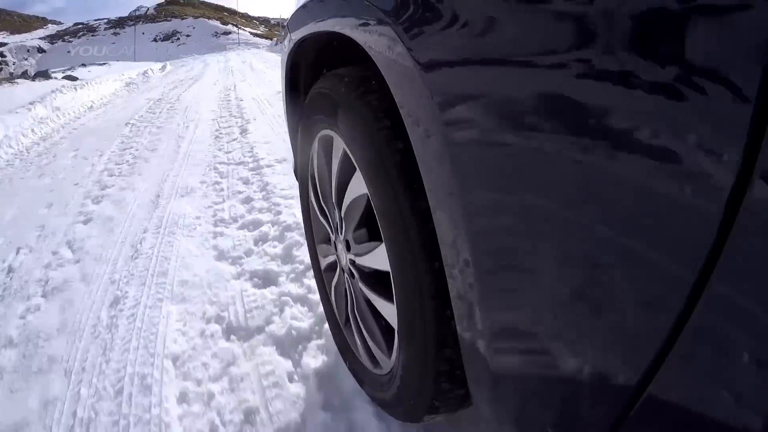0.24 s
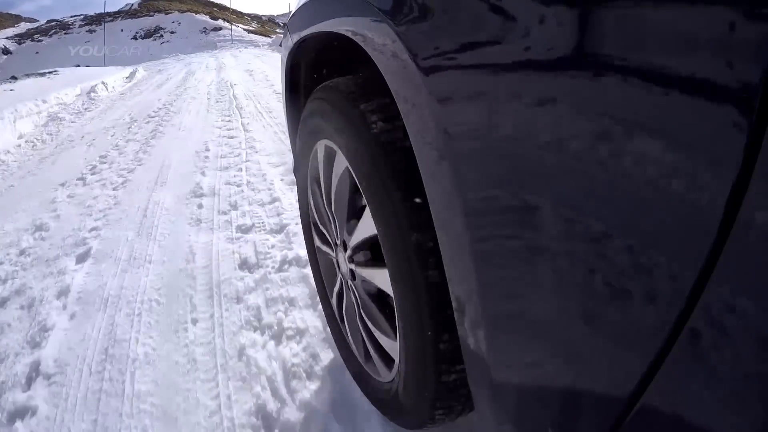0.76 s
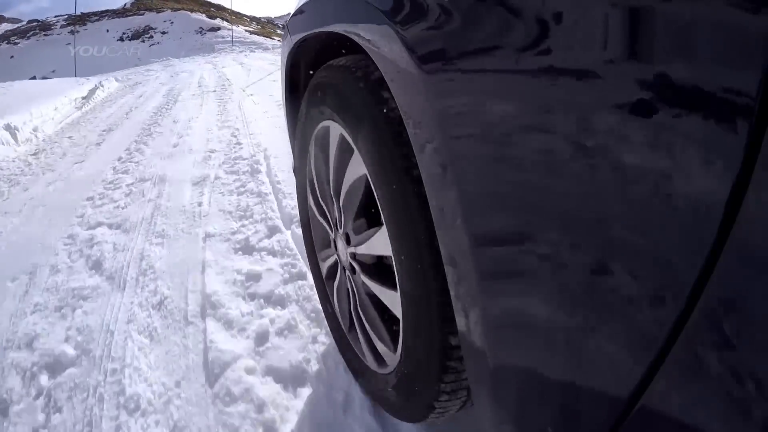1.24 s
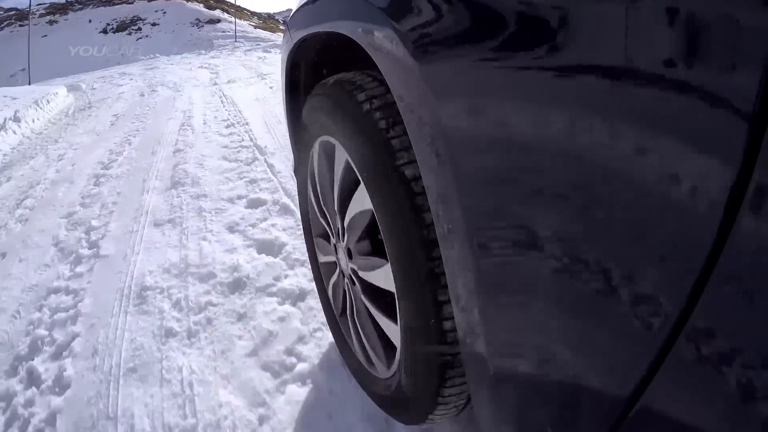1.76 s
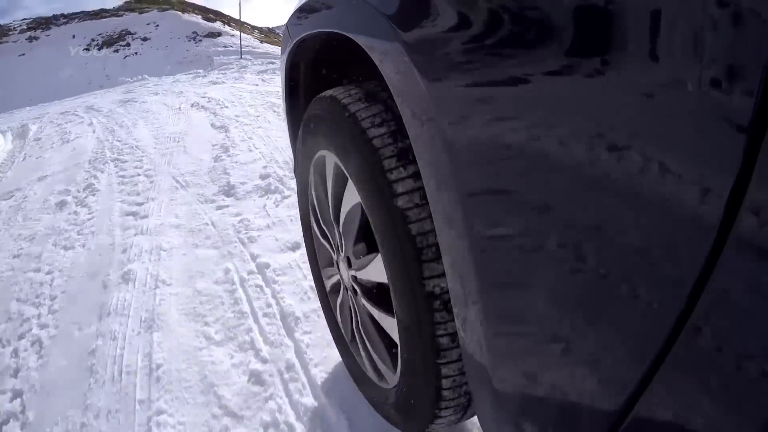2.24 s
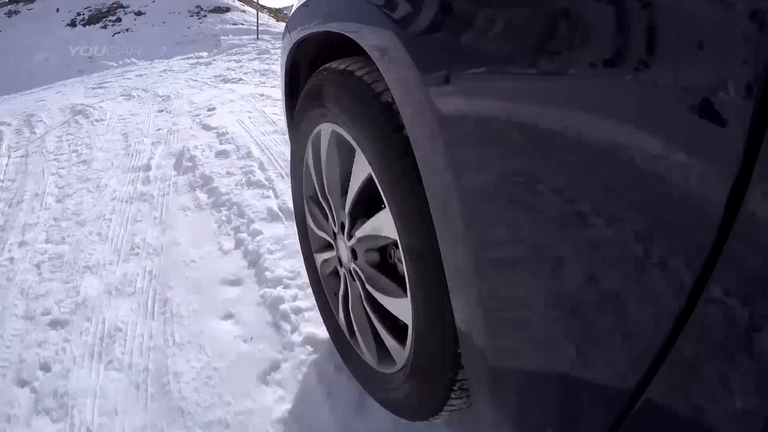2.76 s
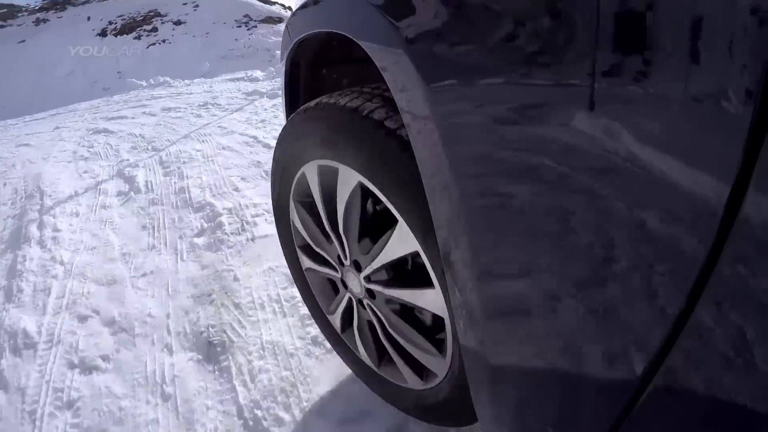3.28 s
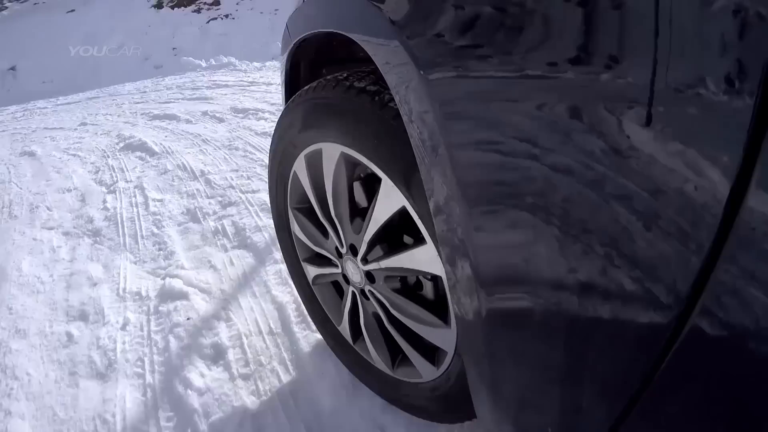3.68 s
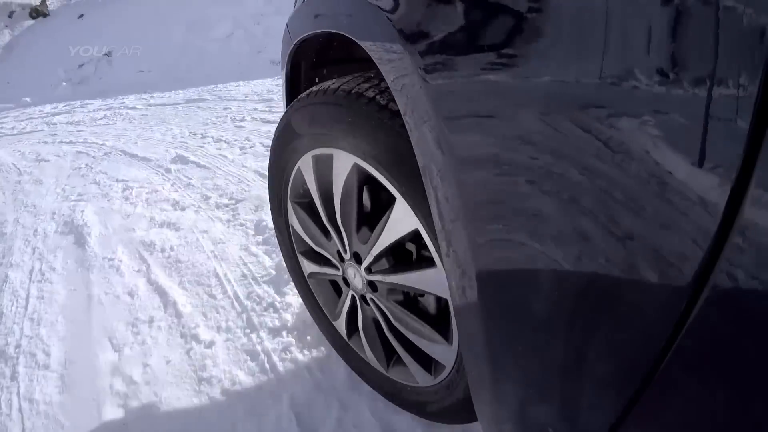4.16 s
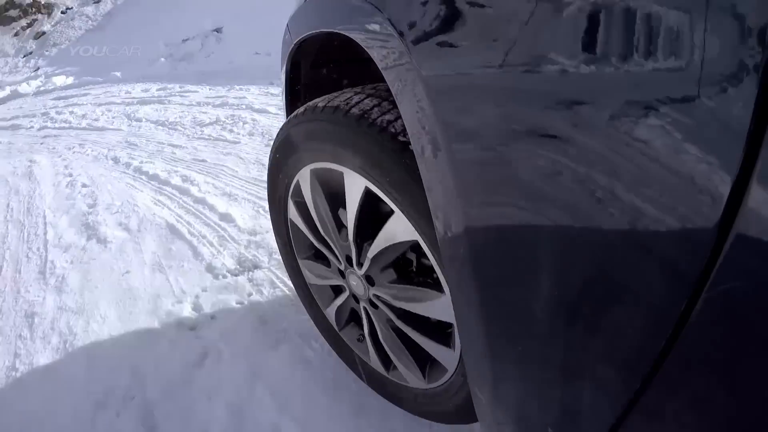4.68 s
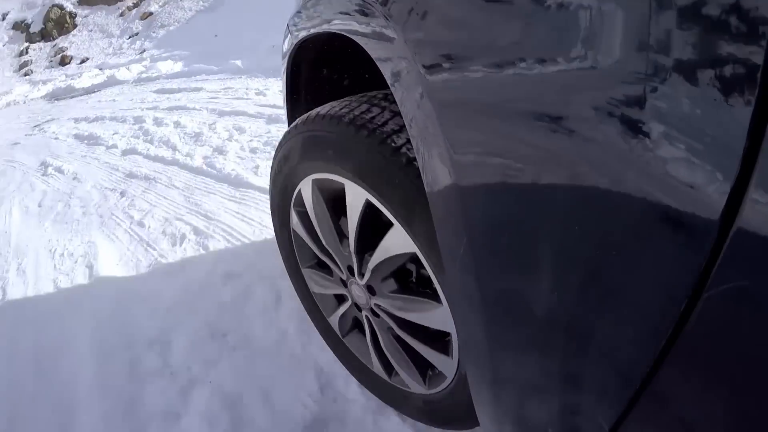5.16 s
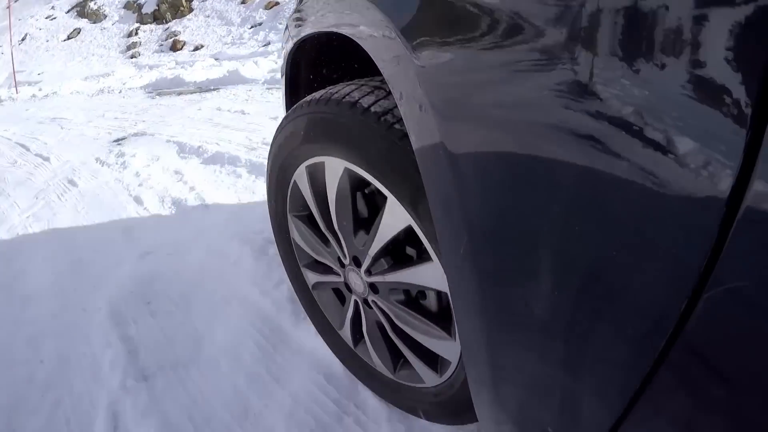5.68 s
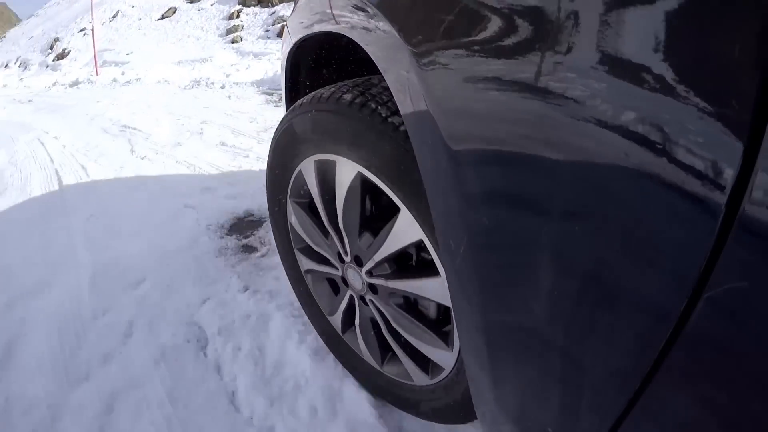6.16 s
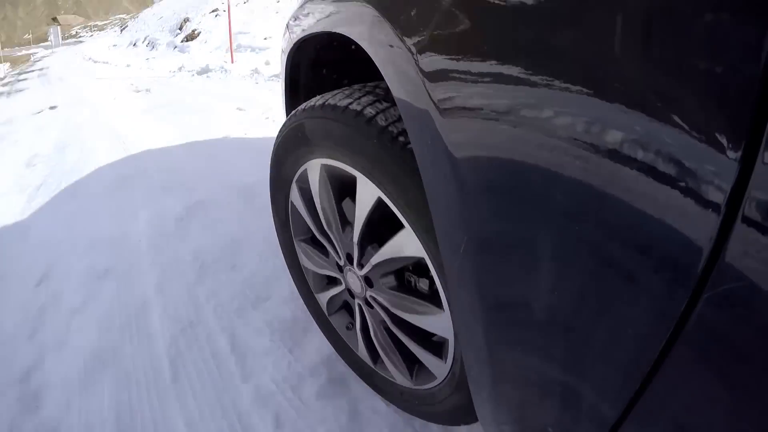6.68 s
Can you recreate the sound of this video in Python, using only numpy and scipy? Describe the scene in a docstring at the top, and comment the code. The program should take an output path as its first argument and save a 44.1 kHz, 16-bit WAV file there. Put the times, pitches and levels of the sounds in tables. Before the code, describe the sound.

Continuous rolling over packed snow and ice, heard from a microphone mounted on the car door. Low shaking and booming swell unevenly, almost overloading, with a muffled road drone above. Gritty tread crunch is clearer at first, then hollow arch knocks come in clusters, busiest near three and five and a half seconds. Tiny bright ice snaps scatter over it, with faint thin whine and hiss behind; rolling continues to the end.

```python
"""A low, uneven shake and boom fills a car door beside the front wheel as it rolls over packed snow and ice.
Four wavering sine modes and shaped noise make the body; coloured, grainy noise makes drone, hiss and powder.
Noise puffs ring the wheel arch as knocks and snap on the panel as ice grit, over noise crumbs in the arch.
Behind them a camera's circuits whine faintly, a tone stepping 25 times a second, over a thin steady hiss."""
import sys
import numpy as np
from scipy import signal
from scipy.fft import rfft, irfft, next_fast_len
from scipy.io import wavfile
from scipy.ndimage import uniform_filter1d, minimum_filter1d, map_coordinates

SR = 44100
rng = np.random.default_rng(int(sys.argv[2]) if len(sys.argv) > 2 else 0)


def linear_from_db(decibels):
    """Turn decibels (scalar or array-like) into linear amplitude factors; 0 gives 1."""
    return 10 ** (np.asarray(decibels, float) / 20)


def generate_wav(signal):
    """Clip the signal to [-1, 1] and save it as 16-bit WAV at the path in sys.argv[1]."""
    frames = np.transpose(np.atleast_2d(signal))
    scaled = np.clip(frames, -1, 1) * 32767
    pcm = np.round(scaled).astype(np.int16)
    wavfile.write(sys.argv[1], SR, pcm)


N = 305613

# body vibration, before each mode's own offset: start_s, shake_level_db, boom_level_db
BODY_LEVELS = [(0.0, -26, -15), (0.11, -23, -14), (0.39, -16.5, -14.5), (0.62, -19.5, -23.5),
               (0.67, -21, -11.5), (0.98, -15, -19.5), (1.02, -29, -11), (1.14, -13, -15),
               (1.33, -14.5, -9), (2.07, -18.5, -18), (2.18, -26, -9), (2.33, -10.5, -17.5),
               (2.45, -20, -33), (2.68, -16, -17.5), (2.76, -7.5, -20.5), (2.91, -24.5, -24.5),
               (2.95, -12, -18.5), (3.07, -11, -30), (3.32, -16, -16), (3.65, -11, -33),
               (3.71, -12.5, -23.5), (4.52, -11, -22.5), (4.59, -22, -18), (4.84, -10, -30.5),
               (4.96, -12, -21.5), (5.06, -10, -33), (5.23, -13.5, -18), (5.27, -5.5, -42),
               (5.33, -7.5, -18.5), (5.58, -20.5, -24.5), (6.5, -13, -23.5), (6.74, -12.5, -19),
               (6.87, -6.5, -19.5), (6.93, -22, -31)]
# lower mode of each pair and the gap up to the upper boom: start_s, shake_pitch_hz, boom_pitch_hz, boom_gap_hz
BODY_PITCHES = [(0, 24.96, 69, 9.84), (0.6, 27.46, 68.5, 10.95), (1.2, 25.5, 71.5, 8), (2.0, 26.98, 66, 13),
                (2.8, 27.48, 66, 13), (3.1, 22.5, 62, 18.1), (3.4, 22.3, 71, 8), (4.5, 22.2, 71, 8),
                (4.9, 22.2, 70, 16.9), (5.4, 25, 69.5, 14), (6.93, 22.31, 69, 14.9)]
# close modes of the shake: level_offset_db, pitch_drift_hz, phase_waver_rad, wavers_per_s
SHAKE_MODES = [(-2, 0.699, 0.71, 15), (-7, 1, 0.38, 14)]
# close modes of the boom: level_offset_db, pitch_drift_hz, phase_waver_rad, wavers_per_s
BOOM_MODES = [(-2, 1.22, 0.5, 18), (-6.5, 1.5, 0.75, 15)]
# rolling layers, before each layer's gain: start_s, drone_level_db, tread_hiss_level_db, arch_crumb_level_db,
# powder_spray_level_db
ROLLING_LEVELS = [(0.0, -38, -47.5, -56, -62), (0.2, -38.5, -46.5, -57, -59.5), (0.45, -38, -47, -52, -65),
                  (0.91, -40.5, -47.5, -51, -63), (1.3, -39, -50.5, -39, -59), (1.65, -44, -51, -46, -69),
                  (1.88, -46.5, -49, -42, -51.5), (2.14, -42.5, -57, -38.5, -65),
                  (2.5, -44, -58.5, -41.5, -74), (2.9, -41.5, -59, -29.5, -69),
                  (3.15, -46.5, -60, -30.5, -78), (3.35, -42.5, -54.5, -51, -71),
                  (3.7, -42.5, -56.5, -47, -61), (3.9, -39, -54.5, -34, -63), (4.1, -41, -56, -44, -65),
                  (4.3, -37.5, -59, -37, -68.5), (4.75, -46, -63.5, -33.5, -66),
                  (4.95, -43.5, -56, -44.5, -65), (5.4, -42.5, -64, -24.5, -68),
                  (5.75, -41.5, -57.5, -49, -70), (6.1, -42.5, -55.5, -42, -67), (6.3, -47, -57, -42, -65),
                  (6.5, -44.5, -57, -44, -71), (6.93, -35.5, -61, -34.5, -76)]
# relative spectrum of the body's broad rumble: frequency_hz, density_db
RUMBLE_SPECTRUM = [(4.7, -43), (8.0, 10.5), (27, -1.5), (48, 2.5), (75, -14.5), (89, -9.5), (99, -12.5),
                   (113, -46.5), (130, -50), (170, -28.5), (290, -120)]
# relative spectrum of the road drone: frequency_hz, density_db
DRONE_SPECTRUM = [(70, -42), (100, 2.5), (125, -4.5), (152, 1), (166, -14.5), (188, -3), (198, -8.5),
                  (213, 0), (240, -7), (260, -9.5), (292, -5.5), (318, -8), (365, -22.5), (430, -19),
                  (600, -23)]
# relative spectrum of snow crunching under the tread: frequency_hz, density_db
CRUNCH_SPECTRUM = [(240, -16), (400, -5), (900, 2), (1400, -4.5), (2030, -3), (2700, -4), (2950, 3),
                   (3300, -8), (3550, -4), (3720, -2), (3950, -11.5), (4800, -15.5), (5450, -12.5),
                   (6150, -28), (6700, -20), (8500, -42), (11000, -43), (18700, -120)]
# relative spectrum of powder on the panel: frequency_hz, density_db
SPRAY_SPECTRUM = [(2350, -26), (4000, -5), (4940, 8), (5970, -19), (6590, 2.5), (7370, -3), (13100, -5),
                  (14800, -8), (16300, -26)]
# resonances of wheel arch and panel: pitch_hz, width_hz, level_db
ARCH_MODES = [(300.6, 24, -4.5), (499, 36, -3.5), (674, 53.5, 3), (940, 34, -0.5), (1327, 252, -5.5),
              (1655, 62.6, -2), (1798, 46.4, -5), (2206, 26.5, -6.5), (2282, 29.6, -6), (2470, 117, -5.5),
              (2915, 85, -9.5), (3610, 51, -24), (4330, 110, -26.5), (4900, 73, -19), (5260, 88, -25),
              (5870, 600, -41), (5630, 170, -25)]
# clear knocks in the arch, before the layer gains: start_s, level_db, brightness_db (relative to level)
CLEAR_KNOCKS = [(0.058, -27, -4), (0.086, -22.5, -12), (0.507, -27, -24), (0.719, -24.5, -22),
                (0.744, -21.5, -26), (0.766, -23, -11), (0.819, -20, -25), (0.886, -21.5, -17),
                (0.976, -21, -25), (0.995, -21, -13), (1.355, -23, -14), (1.613, -29, -16),
                (1.714, -23, -14), (1.748, -21, -19), (1.76, -22, -20), (1.784, -20.5, -17),
                (1.959, -14.5, -6), (2.13, -24.5, -12), (2.307, -28, -30), (2.43, -32.5, -22),
                (2.599, -12, -15), (2.67, -13.5, -28), (2.706, -25, -29), (2.731, -20, -28),
                (2.745, -9, -21), (2.781, -22, -24), (2.794, -8, -23), (2.812, -11, -21), (2.858, -22, -7),
                (2.896, -14, -34), (2.914, -19, -23), (2.932, -10.5, -26), (2.953, -23.5, -22),
                (2.969, -10.5, -14.5), (3.01, -22, -34), (3.06, -29.5, -32), (3.083, -22, -36),
                (3.099, -23, -27), (3.12, -12, -17), (3.148, -20, -29), (3.166, -19, -30),
                (3.216, -14.5, -40), (3.452, -19, -20), (3.479, -22, -10), (3.546, -10.5, -16.5),
                (3.732, -13, -30), (3.768, -20, -30), (3.791, -17, -29), (3.84, -16.5, -25),
                (3.857, -11, -9), (3.868, -17, -30), (3.877, -14, -30), (3.911, -6, -12),
                (4.199, -11.5, -27), (4.326, -27, -24), (4.389, -14.5, -25), (4.427, -12, -29),
                (4.493, -16, -28), (4.505, -17, -29), (4.572, -20, -22), (4.637, -19, -28),
                (4.654, -13, -27), (4.675, -9, -16), (4.702, -26, 3), (4.731, -14, -28), (4.762, -19, -30),
                (4.8, -16.5, -25), (4.941, -25.5, -11), (4.986, -27, -5), (5.038, -16, -23),
                (5.048, -16, -32), (5.089, -17, -33), (5.104, -17.5, -20), (5.179, -17.5, -25),
                (5.202, -18, -19), (5.226, -19.5, -9), (5.267, -11, -17), (5.28, -10.5, -30),
                (5.32, -14, -30), (5.343, -8.5, -23), (5.351, -2.5, -20), (5.377, -8.5, -24),
                (5.392, -8, -15.5), (5.417, -6, -22), (5.427, -13, -27), (5.433, -8.5, -28),
                (5.45, -9, -21), (5.482, -15.5, -27), (5.528, -14.5, -21), (5.559, -15, -32),
                (5.582, -20.5, -18), (5.612, -15.5, -17), (5.634, -27, -28), (5.718, -26, -22),
                (5.736, -23, -12), (5.801, -21, -29), (5.817, -16, -31), (5.975, -19, -30),
                (6.109, -20.5, -13), (6.161, -22, -24), (6.192, -19.5, -27), (6.231, -19, -27),
                (6.244, -25, -12), (6.282, -25, -29), (6.307, -19, -16), (6.367, -25.5, -13),
                (6.561, -14.5, -19), (6.639, -20.5, -31), (6.652, -22.5, -25), (6.683, -16.5, -34),
                (6.727, -14.5, -15), (6.752, -13.5, -36), (6.789, -21, -32), (6.808, -15.5, -28),
                (6.823, -17.5, -31), (6.85, -17, -22), (6.865, -11, -17.5)]
# clear ice grains on the panel, before the part gains: start_s, level_db, lower_part_db (relative to level)
CLEAR_GRIT = [(0.0735, -32, -3), (0.0879, -1, -17.5), (0.18, -28, -6), (0.1992, -22.5, -6),
              (0.783, -17, -15), (0.8886, -13.5, -11), (0.94, -22.5, -2), (0.9718, -22.5, -7),
              (0.9963, -29, -3), (1.0757, -34, -5), (1.1117, -35, -11), (1.1817, -31, -11),
              (1.1947, -32, -16), (1.2034, -35, -11), (1.2104, -32, -11), (1.2271, -33, -14),
              (1.3033, -26, -8), (1.3509, -24.5, -4), (1.6761, -30.5, -1), (1.706, -33, -7),
              (1.7187, -25, -7), (1.7265, -30.5, -1.5), (1.8203, -22, -9), (1.8303, -18, -8),
              (1.8945, -29, -4), (1.905, -23.5, -5), (1.921, -27.5, 4), (1.9572, 3.5, -12),
              (1.9744, -24, -8), (1.9839, -20, -5.5), (2.0063, -25, -11), (2.1285, -30, -1),
              (2.1815, -25, -10), (2.5576, -14, -5.5), (2.6339, -35, 1), (2.8066, -37, 9),
              (2.8135, -26.5, 1.5), (2.8576, -24, 0), (3.385, -34, -2), (3.481, -17, -9),
              (3.6071, -31.5, -4.5), (3.6805, -28, -7), (3.6895, -24, -8), (3.7011, -21, -9),
              (3.8307, -37, -7), (3.848, -20, -7), (4.147, -24, -17), (4.592, -27, -4), (4.618, -20.5, -7),
              (4.6945, -31, 7), (4.7005, -1.5, -9.5), (4.7037, -15, -2), (4.735, -30, -1),
              (4.765, -20.5, -16), (4.8561, -26.5, -6.5), (4.8821, -29.5, -14), (4.8975, -30, -22),
              (4.9816, -21, -20), (4.9862, -31, 0), (5.0042, -16, -7), (5.1292, -28.5, -5.5),
              (5.1833, -28.5, -11), (5.4524, -21.5, -8.5), (5.518, -33, -7), (5.535, -18.5, -8.5),
              (5.7249, -34, -3), (5.7458, -28, 1.5), (5.7845, -30, -5), (5.8288, -24, -17),
              (5.9554, -32, -2.5), (6.0146, -23.5, -20), (6.1455, -32.5, -9), (6.2268, -23.5, -11),
              (6.2384, -33, -7), (6.2453, -25, -14), (6.2595, -29, -5.5), (6.2721, -26, -8),
              (6.323, -27.5, -5), (6.3434, -12, -12), (6.375, -29, -3), (6.3865, -31, -0.5),
              (6.4163, -35, -6), (6.4702, -34, -2.5), (6.6782, -33.5, -2)]
# one 40 ms round of the whine, before its wobble and higher last step: time_ms, pitch_hz
WHINE_ROUND = [(0, 9900), (7, 9950), (8, 9400), (11, 9650), (17, 9750), (19, 9050), (28, 8800), (38, 8800),
               (40, 8600)]

UPPER_SHAKE_HZ = 31
# bumps in the road swell each mode at random; these depths and rates scale smooth random curves
SWELL_DB, SWELLS_PER_S, DRIFTS_PER_S = 2.5, 9, 3
# the typical push of a lump, and its log-normal spread
PUSH_MS, PUSH_SPREAD = 5.13, 0.26
THUD_SPREAD_DB = 1.9
# small knocks: level above the arch crumbs, and brightness relative to the knock
SMALL_KNOCKS_PER_S, SMALL_KNOCK_DB, SMALL_KNOCK_SPREAD_DB, SMALL_KNOCK_BRIGHT_DB = 30, 3.5, 3, -19
# fine grit: its rate holds at the reference spray level, and clumps raise or lower it
FINE_GRIT_PER_S, FINE_GRIT_DB, FINE_GRIT_SPREAD_DB, FINE_GRIT_LOWER_DB = 18, -45, 3.5, 2
REFERENCE_SPRAY_DB, GRIT_CLUMP_DB, GRIT_CLUMPS_PER_S = -61.5, 7, 9
PICTURES_PER_S, FIRST_PICTURE_S = 25, 0.012
ROUNDS_PER_HIGH_STEP = 3.51  # every third or fourth round ends on a higher step


def body():
    """The car body vibrates in two pairs of wavering low modes over a broad rumble."""
    shake_db, boom_db = curves(BODY_LEVELS)
    shake_hz, boom_hz, gap_hz = curves(BODY_PITCHES)
    shake = pair([shake_hz, UPPER_SHAKE_HZ], SHAKE_MODES, shake_db)
    boom = pair([boom_hz, boom_hz + gap_hz], BOOM_MODES, boom_db)
    rumble_db = -18.5 + 2.36 * wobble(3.053)
    rumble = linear_from_db(rumble_db) * coloured(rng.standard_normal(N), RUMBLE_SPECTRUM)
    return shake + boom + rumble


def pair(pitches_hz, modes, level_db):
    """Two close modes share one level curve, each drifting and swelling on its own."""
    total = 0
    for hz, (offset_db, drift_hz, waver, rate) in zip(pitches_hz, modes):
        drifting_hz = hz + drift_hz * wobble(DRIFTS_PER_S)
        swelling_db = level_db + offset_db + SWELL_DB * wobble(SWELLS_PER_S)
        total = total + mode(drifting_hz, swelling_db, waver, rate)
    return total


def mode(hz, db, waver, rate):
    """A body mode is a sine of rms level db whose phase wanders."""
    swell = uniform_filter1d(linear_from_db(db), size=SR // 30)  # level changes are eased over a thirtieth of a second
    phase = 2 * np.pi * np.cumsum(hz) / SR + waver * wobble(rate)
    return swell * np.sqrt(2) * np.sin(phase)


def rolling():
    """Road noise drones through the body, snow hisses under the tread, crumbs ring the arch, powder sprays."""
    drone_db, hiss_db, crumb_db, spray_db = curves(ROLLING_LEVELS)
    drone_db = drone_db + 0.49 * wobble(12) + 1.1 * wobble(4.6)
    drone = linear_from_db(drone_db) * coloured(rng.standard_normal(N), DRONE_SPECTRUM)
    snow = gritty(980, spread_db=7.0, share=0.25)
    hiss = linear_from_db(hiss_db + 2 * wobble(60)) * coloured(snow, CRUNCH_SPECTRUM)
    crumbs = linear_from_db(crumb_db + 6 * wobble(110)) * rng.standard_normal(N)
    powder = gritty(420, spread_db=2.5, share=0.6)
    patter_db = np.clip(5 * wobble(90) + 4 * wobble(12), -18, 7)
    spray = linear_from_db(spray_db + patter_db) * coloured(powder, SPRAY_SPECTRUM)
    return linear_from_db(2.26) * drone + linear_from_db(10.0) * hiss + linear_from_db(3.5) * arch(crumbs, ARCH_MODES) + linear_from_db(7.0) * spray


def knocks():
    """Lumps push the arch for milliseconds: middle modes speak first, deep ones build up, bright hits rasp."""
    at, dice, size, hard, _ = scattered(count=400)
    time_s, _, _, crumb_db, _ = np.transpose(ROLLING_LEVELS)
    small_db = np.interp(at, time_s, crumb_db) + SMALL_KNOCK_DB + SMALL_KNOCK_SPREAD_DB * np.minimum(size, 1)
    small_db = small_db - 120 * (dice > SMALL_KNOCKS_PER_S * N / SR / len(at))  # mutes the surplus
    small = np.transpose([at, small_db, SMALL_KNOCK_BRIGHT_DB + 6 * hard])
    s, db, bright_db = np.vstack([small, CLEAR_KNOCKS]).T
    push_s = np.clip(PUSH_MS * np.exp(PUSH_SPREAD * rng.standard_normal(len(s))), 1, 20) / 1000
    deep, middle, top = ([m for m in ARCH_MODES if lo < m[0] < hi]
                         for lo, hi in [(0, 1100), (1100, 4000), (4000, 9000)])
    thud_db = db - 2.5 + THUD_SPREAD_DB * rng.standard_normal(len(s))
    thud = arch(bursts(s + 0.00053, thud_db, push_s / 1.32, 4.8 * push_s), deep)
    knock = arch(bursts(s, db, push_s / 12, 2.89 * push_s), middle)
    rasp = arch(bursts(s + 0.00059, db + bright_db + 22.5, push_s / 6, 2.0 * push_s), top)
    lower = band(band(thud + knock, 160, 5500), 150, 6300)
    upper = band(band(rasp, 2900, 6900), 2900, 6900)
    return linear_from_db(20) * (lower + upper)


def grit():
    """Ice grains snap on the panel as noise puffs: a bright tick, a duller part and a short panel ring."""
    at, dice, size, dull, _ = scattered(count=600)
    time_s, _, _, _, spray_db = np.transpose(ROLLING_LEVELS)
    clump_db = GRIT_CLUMP_DB * wobble(GRIT_CLUMPS_PER_S)[(at * SR).astype(int)]
    busy = np.minimum(linear_from_db(np.interp(at, time_s, spray_db) - REFERENCE_SPRAY_DB + clump_db), 5)
    fine_db = FINE_GRIT_DB + FINE_GRIT_SPREAD_DB * np.minimum(size, 1)
    fine_db = fine_db - 120 * (dice > busy * FINE_GRIT_PER_S * N / SR / len(at))  # mutes the surplus
    fine = np.transpose([at, fine_db, FINE_GRIT_LOWER_DB + 5 * dull])
    s, db, lower_db = np.vstack([fine, CLEAR_GRIT]).T
    ones = np.ones(len(s))
    tick = band(bursts(s, db + 9.5, 0.00033 * ones, 0.0039 * ones), 7050, 15500)
    snap = band(bursts(s, db + lower_db + 13.5, 0.00019 * ones, 0.0091 * ones), 1800, 5670)
    ring = band(bursts(s, db + lower_db + 3.0, 0.00091 * ones, 0.035 * ones), 4420, 5650)
    return tick + snap + ring


def whine():
    """Camera circuits sing a faint tone stepping round once per picture, with a mirror tone as each begins."""
    turns = (np.arange(N) / SR - FIRST_PICTURE_S) * PICTURES_PER_S
    ms, hz = np.transpose(WHINE_ROUND)
    into_ms = turns % 1 * 1000 / PICTURES_PER_S
    high = np.floor(turns + 1) % ROUNDS_PER_HIGH_STEP <= 1
    pitch = np.interp(into_ms, ms, hz) + 500 * high * (into_ms > 19)
    pitch = pitch + (into_ms < 19) * 130 * wobble(30) + 80 * wobble(400)
    level_db = -56 + 1.6 * wobble(120) - 4.7 * (into_ms < 8)
    tone = np.sin(2 * np.pi * np.cumsum(pitch) / SR)
    mirror = linear_from_db(-2) * (into_ms < 8) * np.sin(2 * np.pi * np.cumsum(18450 - pitch) / SR)
    return linear_from_db(level_db) * (tone + mirror)


def thin_hiss():
    """A steady thin hiss: noise band-passed around 10.1 kHz."""
    return linear_from_db(-61) * band(rng.standard_normal(N), 10000, 10200)


def arch(x, rows):
    """x rings through parallel resonances of alternating sign."""
    def response(f):
        return sum((-1) ** k * linear_from_db(db) * 1j * f * width / (centre ** 2 - f * f + 1j * f * width)
                   for k, (centre, width, db) in enumerate(rows))
    return filtered(x, response)


def bursts(starts_s, peaks_db, rises_s, t60s):
    """A short puff of noise at each start, its energy set by its outline alone."""
    t = np.arange(SR // 20) / SR
    shape = (1 - np.exp(-t / rises_s[:, None])) * linear_from_db(peaks_db[:, None] - 60 * t / t60s[:, None])
    puffs = shape * rng.standard_normal(shape.shape)
    puffs *= np.sqrt(np.sum(shape ** 2, 1) / np.sum(puffs ** 2, 1))[:, None]
    at = np.round(starts_s * SR).astype(int)[:, None] + np.arange(len(t))
    return np.bincount(at.ravel(), puffs.ravel(), N + SR)[:N]


def gritty(per_s, spread_db, share):
    """Steady noise mixed with single grains breaking at random moments."""
    size_db = spread_db * np.minimum(rng.exponential(size=N), 2.5)
    grains = (rng.random(N) < per_s / SR) * linear_from_db(size_db) * rng.standard_normal(N)
    share = np.clip(share, 0, 1)
    return np.sqrt(share) * unit(grains) + np.sqrt(1 - share) * rng.standard_normal(N)


def scattered(count):
    """Random moments, with two uniform draws and three normal draws for each."""
    rows = np.hstack([rng.random((count, 2)), rng.standard_normal((count, 3))])
    return rows[:, 0] * N / SR, *rows[:, 1:].T


def curves(rows):
    """One value per sample for each column after the time."""
    s, *cols = np.transpose(rows)
    return [np.interp(np.arange(N) / SR, s, c) for c in cols]


def wobble(rate):
    """A smooth random curve, rate knots a second."""
    return map_coordinates(rng.standard_normal(N // 100), [np.arange(N) * rate / SR])


def unit(x):
    """x scaled to rms 1."""
    return x / np.sqrt(np.mean(x ** 2) + 1e-20)


def filtered(x, response):
    """x times a complex response of frequency."""
    m = next_fast_len(N + SR // 2)
    return irfft(rfft(x, m) * response(np.fft.rfftfreq(m, 1 / SR)), m)[..., :N]


def coloured(x, spectrum):
    """x shaped by a spectrum drawn on a log frequency axis, at rms 1."""
    f, db = np.transpose(spectrum)
    return unit(filtered(x, lambda hz: linear_from_db(np.interp(np.log(hz + 1), np.log(f + 1), db, -120, -120))))


def band(x, lo_hz, hi_hz):
    """A causal band-pass."""
    sos = signal.butter(2, [lo_hz, min(hi_hz, SR / 2.1)], "bandpass", fs=SR, output="sos")
    return signal.sosfilt(sos, x)


def scene():
    """Everything reaches one microphone."""
    return (body() + rolling() + knocks() + grit() + whine() + thin_hiss())[None]


def band_limit(x):
    """A steep low-pass at the top of the band."""
    return signal.sosfilt(signal.butter(12, 16470, fs=SR, output="sos"), x)


def record(dry):
    """The microphone rolls off below 12 Hz and above 15.3 kHz, gain control holds swells down, peaks clip."""
    heard = filtered(dry, lambda hz: 1 / np.sqrt(1 + (hz / 15300) ** 24) * hz ** 4 / (hz ** 4 + 12 ** 4))
    swell = np.abs(uniform_filter1d(heard, size=SR // 500))
    needed = np.minimum(1, 0.66 / (swell + 1e-9))
    gain = uniform_filter1d(minimum_filter1d(needed, size=SR // 12), size=SR // 14)
    return band_limit(np.clip(gain * heard, -1, 1))


dry = scene()
out = record(dry)
generate_wav(out)
```